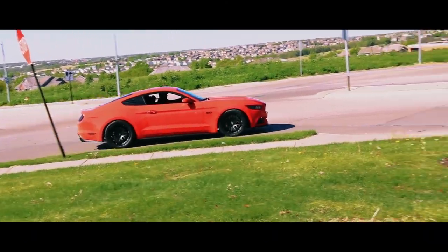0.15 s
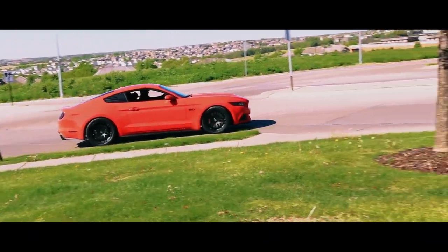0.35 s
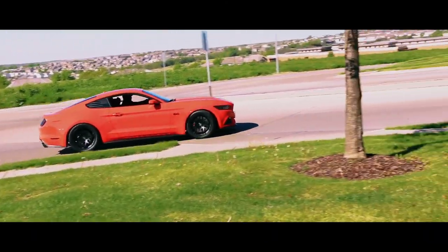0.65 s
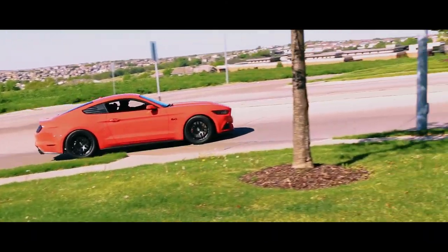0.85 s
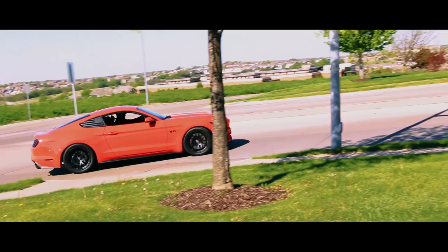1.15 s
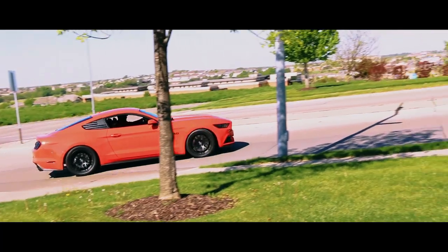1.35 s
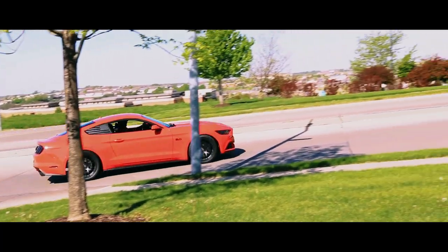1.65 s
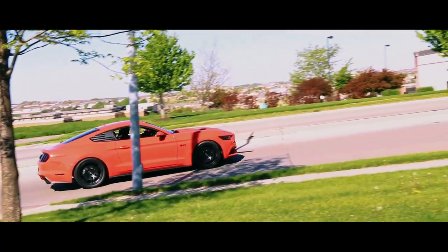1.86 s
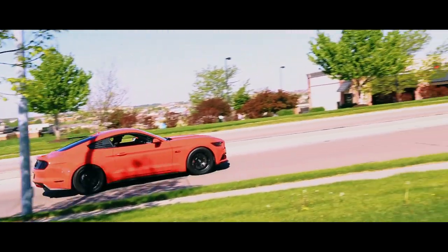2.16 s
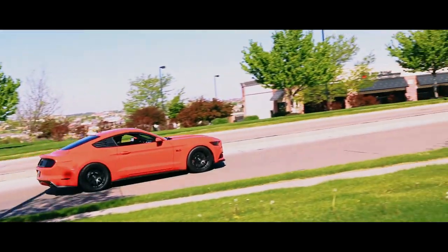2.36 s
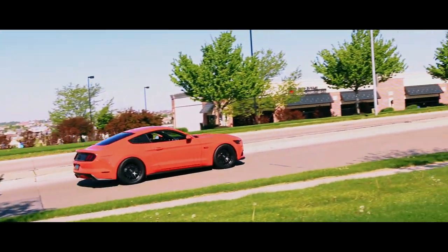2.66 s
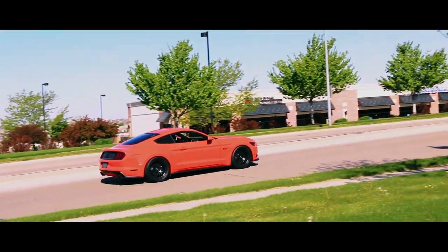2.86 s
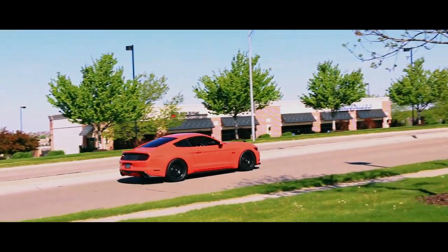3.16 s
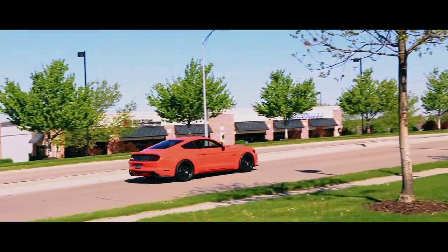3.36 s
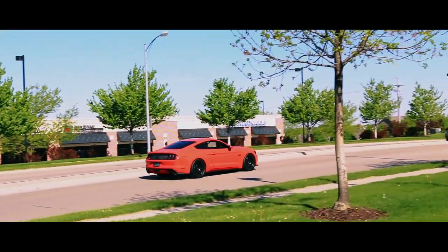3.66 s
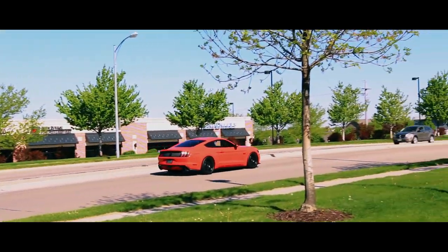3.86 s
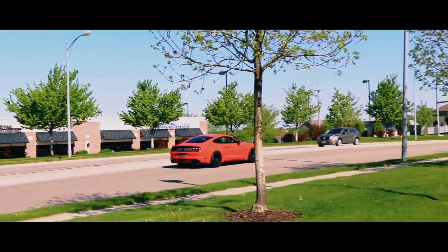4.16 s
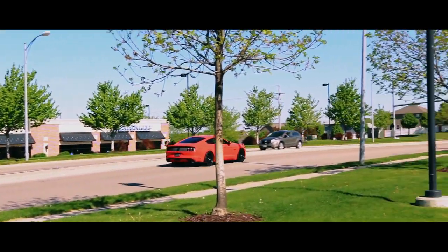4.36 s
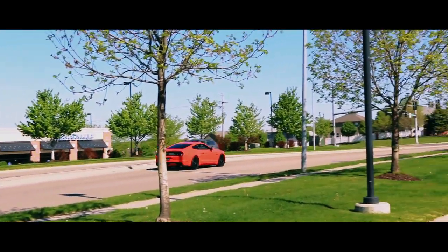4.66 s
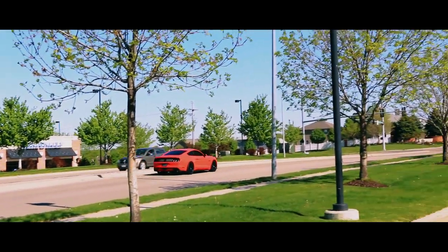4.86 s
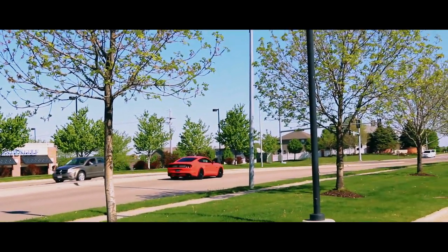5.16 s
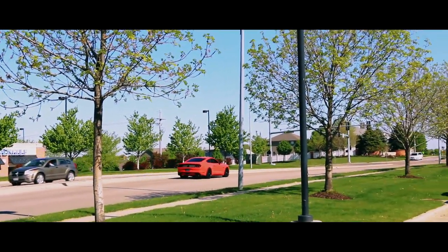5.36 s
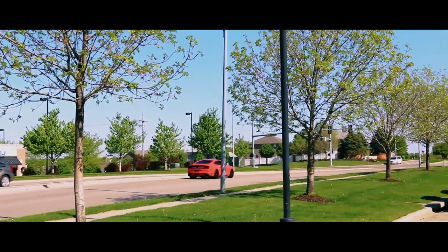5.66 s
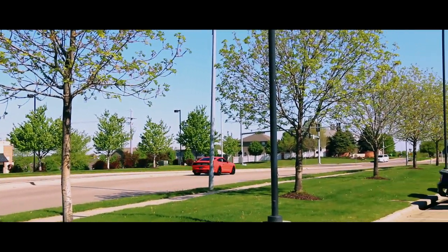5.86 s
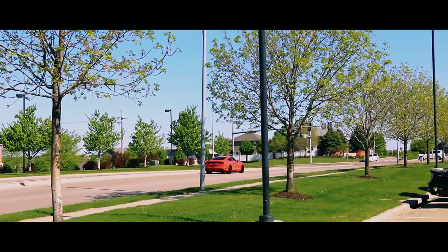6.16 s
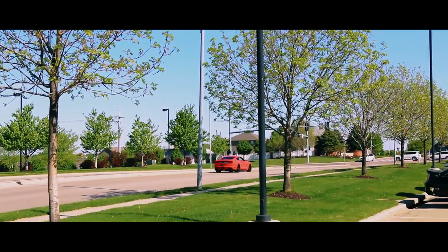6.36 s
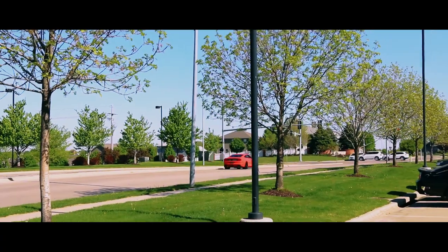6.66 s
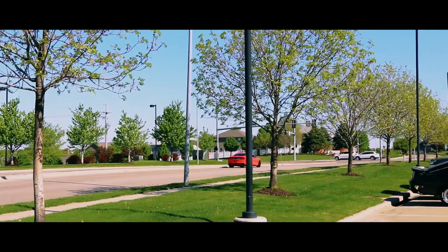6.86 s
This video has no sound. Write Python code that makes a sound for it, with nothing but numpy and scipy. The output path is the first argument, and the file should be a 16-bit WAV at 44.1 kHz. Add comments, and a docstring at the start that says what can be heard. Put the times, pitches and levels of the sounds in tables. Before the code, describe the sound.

One powerful car pulls away past an outdoor microphone: deep uneven pulses smooth into a rising, tearing exhaust note with a bright hissing edge. The throttle shuts for a gear change with muffled pops, then snaps open in a rough bark and settles into a droning second pull. Loud late cracks follow over road noise, faint low wind, short street reflections and an oncoming car's soft hum.

```python
"""The uneven burble of a V8 coupe is heard first, pulling away along a suburban road in a light wind.
It lifts off for a gear change, pulls again and lifts once more with exhaust pops, as a second car comes
the other way. Firing pulses excite pipe modes, gas noise and engine orders; road, verge and street
reflect them. Filtered noise makes the wind and the road's background, a sine the second car's hum.
The microphone input clips on the sharpest pulses."""
import sys
import numpy as np
from scipy import signal
from scipy.io import wavfile
from scipy.ndimage import uniform_filter1d

SR = 44100
rng = np.random.default_rng(int(sys.argv[2]) if len(sys.argv) > 2 else 0)


def to_wav(sig):
    """Store sig (one row per channel, or 1-D mono) as 16-bit WAV at the path in sys.argv[1].

    Samples outside -1..1 are clipped; the rate is SR.
    """
    pcm = np.clip(np.atleast_2d(sig), -1, 1) * 32767
    pcm = np.round(pcm).astype(np.int16)
    wavfile.write(sys.argv[1], SR, pcm.T)  # frames by channels


N = 308700  # samples: 7 s


def amp(db):
    """Level to amplitude ratio: 20 dB is a factor of ten."""
    return 10 ** (np.asarray(db) / 20)


def seconds():
    """Uniform sampling: the time of each sample."""
    return np.arange(N) / SR


def evened(x):
    """Normalization: scales to rms 1."""
    return x / np.sqrt(np.mean(x ** 2) + 1e-20)


def steady(x):
    """Automatic levelling: holds the running rms near 1, so that a level curve sets the loudness."""
    power = uniform_filter1d(uniform_filter1d(x ** 2, size=6000), size=6000)
    return x / np.sqrt(abs(power) + 1e-20)


def curves(table):
    """Linear interpolation: every column after the time, one value a sample."""
    time_s, *columns = np.transpose(table)
    return [np.interp(seconds(), time_s, column) for column in columns]


def smooth_noise(size):
    """Moving average of white noise: slow random swells of rms 1."""
    return evened(uniform_filter1d(rng.standard_normal(N), size=size))


def coloured(x, points):
    """Minimum-phase filtering: a causal response whose gain follows (frequency_hz, gain_db) points."""
    frequency_hz, gain_db = np.transpose(points)
    grid_hz = np.fft.rfftfreq(4096, 1 / SR) + 1
    grid_db = np.interp(np.log(grid_hz), np.log(frequency_hz), np.maximum(gain_db, -90))
    half = grid_db * np.log(10) / 20  # log magnitude
    full = np.concatenate([half, half[-2:0:-1]])
    # the phase is the Hilbert transform of the log magnitude
    taps = np.fft.ifft(np.exp(np.conj(signal.hilbert(full)))).real[:2048]
    return signal.oaconvolve(x, taps)[:N]


def high_pass(x, order, hz):
    """Butterworth filtering: attenuates what lies below the cutoff."""
    return signal.sosfilt(signal.butter(order, hz, "high", fs=SR, output="sos"), x)


def clicks(at, size):
    """Fractional delay: each impulse is shared by two samples, so that even spacing stays even."""
    whole = at.astype(int)
    part = at - whole
    return np.bincount(whole, size * (1 - part), N + 1)[:N] + np.bincount(whole + 1, size * part, N + 1)[:N]


# Wind level: time_s [s], level_db [dB rms, before the puffs]
WIND_LEVEL = [(0.0, -30), (0.13, -26), (0.58, -34), (2.55, -43), (2.96, -50.5), (3.9, -39), (4.17, -62),
              (6.57, -23), (7.0, -26)]
# Spectrum of turbulence at the microphone: frequency_hz [Hz], gain_db [dB, relative]
GUST_COLOUR = [(10, -29.5), (30, -10), (65, -1), (130, -4), (180, -3), (1000, -79.5)]
# Puffs of wind: start_s [s], strength_db [dB, relative]
BUFFETS = [(0.13, -15), (0.21, -18), (0.62, -24.5), (0.961, -33), (1.44, -24)]
BUFFET_MS = 8.7  # time constant of each puff's rise and fall


def wind():
    """Turbulent pressure on the microphone: lumpy low noise with a few stronger puffs."""
    lumps = smooth_noise(2500)
    swell = 0
    for start_s, strength_db in BUFFETS:
        from_peak_ms = abs(seconds() - start_s - .02) * 1000
        swell = swell + amp(strength_db) * np.exp(-from_peak_ms / BUFFET_MS)
    turbulence = amp(4.0 * lumps) * coloured(rng.standard_normal(N), GUST_COLOUR)
    return (amp(curves(WIND_LEVEL)[0]) + .5 * swell) * steady(turbulence)


# Broadband road and background noise: time_s [s], level_db [dB, about which it fluctuates]
BACKGROUND_LEVEL = [(0, -30), (2.9, -26.5), (3.1, -34), (4.2, -30), (5.4, -29.5), (6.2, -20), (7, -21)]
# Spectrum of that noise: frequency_hz [Hz], gain_db [dB, relative]
BACKGROUND_COLOUR = [(60, -22.5), (110, -29), (180, -4.5), (320, -7), (700, 3.5), (1200, -3.5),
                     (2500, -11.5), (4500, -24.5), (8000, -38.5), (16000, -75)]


def background():
    """Broadband random noise: road and background throughout, swelling as the second car approaches."""
    lumps = smooth_noise(900)
    noise = evened(coloured(rng.standard_normal(N), BACKGROUND_COLOUR))
    return amp(curves(BACKGROUND_LEVEL)[0] + 1.8 * lumps) * noise


# Engine of the oncoming car: time_s [s], pitch_hz [Hz], level_db [dB rms]
ONCOMING_HUM = [(4.15, 79.3, -49), (5.67, 70.1, -35.5), (7.0, 69.8, -23.5)]


def oncoming():
    """Periodic source: a sinusoidal engine hum, sinking in pitch as the car slows."""
    pitch_hz, hum_db = curves(ONCOMING_HUM)
    fade = np.clip((seconds() - 4.15) / 0.17, .0, 1)
    return np.sqrt(2) * amp(hum_db) * fade * np.sin(2 * np.pi * np.cumsum(pitch_hz) / SR)


STREET_T60_S, STREET_DB = .3, -15  # kerbs, trees and shop fronts: 60 dB decay time, level of the tail


def street(x):
    """Reverberation: sparse decaying echoes of random sign, duller than the direct sound."""
    at = np.arange(300, 20000, 22)
    taps = np.zeros(20100)
    sign = rng.choice([-1., 1.], len(at))
    taps[at + rng.integers(0, 22, len(at))] = sign * amp(-60 * at / SR / STREET_T60_S)
    taps = signal.lfilter([1], [1, -.6], taps)
    return signal.oaconvolve(x, taps / np.linalg.norm(taps))[:N]


NEAR_M, TURN_S, RECEDE_M_PER_S = 20, 2.7, 7.0  # abreast until TURN_S, then drawing away


def distance():
    """Uniform motion: metres from tailpipe to microphone."""
    return NEAR_M + RECEDE_M_PER_S * np.maximum(seconds() - TURN_S, 0)


def echo(x, lag_ms, strength):
    """Reflection as a delayed copy: x arrives later and weaker, at a strength of 0.95 at most."""
    source_sample = np.arange(N) - lag_ms * SR / 1000
    return np.clip(strength, .0, .95) * np.interp(source_sample, np.arange(N), x)


# Bounce off the road: time_s [s], strength [0-1, capped by echo]
ROAD_BOUNCE = [(0, 0.98), (2.7, 0.72), (3.3, 0.77), (5.8, 0.48), (7, 0.16)]
BOUNCE_MS_M = 70.85  # lag times distance [ms m]: the lag shrinks with distance


def road(x):
    """Interference with the ground reflection; rough asphalt scatters its treble."""
    bounce = echo(x, BOUNCE_MS_M / distance(), curves(ROAD_BOUNCE)[0])
    return x + signal.lfilter([.4], [1, -.6], bounce)


# Shorter bounce off the verge: time_s [s], lag_ms [ms], strength [0-1]
VERGE_BOUNCE = [(0, 0.58, 0.25), (3.9, 0.24, 0), (4.3, 0.38, 0.24), (4.75, 0.3, 0.32), (5.0, 0.34, 0.45),
                (5.35, 0.37, 0.67), (7, 0.24, 0.4)]


def verge(x):
    """Comb filtering: a shorter bounce off the verge hollows the treble."""
    return x + echo(x, *curves(VERGE_BOUNCE))


def puffs(train, ms):
    """Turbulent jet noise: each click releases a burst of noise that decays exponentially."""
    envelope = signal.lfilter([1], [1, -np.exp(-1000 / (ms * SR))], train)
    return envelope * rng.standard_normal(N)


def ring(x, hz, width):
    """Damped resonance: one mode of given frequency and bandwidth (Hz), struck by x."""
    t = np.arange(3000) / SR
    return signal.oaconvolve(x, width * np.exp(-np.pi * width * t) * np.cos(2 * np.pi * hz * t))[:N]


BOOM_HZ, BOOM_WIDTH_HZ = 308.3, 92  # lowest pipe mode: frequency, width of its narrower resonance


def thud(train, width):
    """Cascaded resonance: the lowest pipe mode, with steep flanks and little beneath it."""
    above = high_pass(train, 4, 240)
    return -ring(ring(above, BOOM_HZ, width), BOOM_HZ, 3.87 * width)


# Overtones of the exhaust pipe: frequency_hz [Hz], gain_db [dB, relative]
PIPE_COLOUR = [(250, -18), (420, -4.5), (560, 0.0), (1100, 4), (1300, -2), (1550, -14.5), (2200, -43),
               (5000, -96)]


def pipe(train):
    """Pipe resonance: overtones of the pulses, which reach the microphone as pressure dips."""
    return -coloured(train, PIPE_COLOUR)


# Harder firings, and unburnt fuel going off in the pipe:
# start_s [s], blow_db [dB, relative], treble_db [dB, drive of the crack against that of the thump]
POPS = [(0.051, -1.5, -23), (0.147, -6, -25), (0.262, -3, -13.5), (0.315, -2, -14), (0.547, -10.5, -18),
        (0.611, -11, -16), (0.869, -6, -11.5), (0.966, -7.5, -13), (1.015, -17, -11), (1.123, -14, -8),
        (1.45, -8.5, -10), (1.488, -6, -20), (1.61, -7, -9), (3.224, -16, -29), (3.242, -7.5, -32),
        (3.276, -5.5, -12), (3.419, -3.5, -18), (3.574, -10, -27), (3.607, -7.5, -11), (3.651, -13, -8),
        (3.673, -14, -21), (3.694, -7, -33), (3.784, -12, -29), (5.352, -9.5, 5), (5.404, -6.5, -14),
        (5.933, 0.5, -3), (6.052, 0, -1), (6.092, -2, -3), (6.1055, 5.5, 2.5), (6.165, 1.5, 2.5),
        (6.197, 1, 0), (6.2053, 4.5, 4), (6.7745, 8, -1.5), (6.948, 2, -6), (6.964, 3, -26)]
# Spectrum of a pop's crack: frequency_hz [Hz], gain_db [dB, relative]
CRACK_COLOUR = [(500, -15.5), (1200, -5), (2500, 5), (4000, 0), (6000, -18.5), (10000, -36), (16000, -48)]
CRACK_MS = 2.5  # decay time constant of the crack's noise


def pops():
    """Impulsive excitation: each blow thumps the pipe modes, with a short crack on top."""
    start_s, blow_db, treble_db = np.transpose(POPS)
    blows = clicks(start_s * SR, amp(blow_db))
    cracks = clicks(start_s * SR, amp(blow_db + treble_db))
    one = clicks(np.array([.0]), np.array([1.]))  # reference impulse for the peak levels
    thump = 0.5 * thud(blows, 63) / thud(one, 150).max() + .5 * pipe(blows) / pipe(one).max()
    crack = coloured(0.28 * puffs(cracks, CRACK_MS) - cracks, CRACK_COLOUR)
    crack = crack / coloured(one, CRACK_COLOUR).max()
    return road(thump + 0.32 * crack)


# Combustion, steady under load and ragged with the throttle shut: time_s [s], unevenness [0-1]
UNEVEN = [(0, .3), (.3, .15), (3.0, .11), (3.08, .5), (3.8, .5), (3.95, .15), (4.2, .1), (5.3, .15),
          (5.5, .3), (5.8, .3), (5.95, .55), (7, .6)]
# Pulse of each cylinder in firing order; unequal manifolds favour some: level_db [dB, relative]
CYLINDER_DB = [3.5, 1.5, 0.5, -6.5, 2.5, 5.5, 2, 1]
# How far each cylinder's pulse steepens into a crack, in firing order: level_db [dB, relative]
SHOCK_DB = [-10, -16, -8, -11, -18, -18, 0, -4]
# Bank of each cylinder in firing order, from the cross-plane crank's uneven turn-taking: far [0 or 1]
FAR_BANK = [0, 0, 1, 0, 1, 1, 0, 1]
# Far bank's tailpipe against the near one, furthest apart with the car side-on:
# time_s [s], lag_ms [ms], level_db [dB]
BANK = [(0, 0.21, 2), (1.5, 0.41, 4.5), (2.3, 0.46, 2), (3.0, 0.5, 2.5), (4.0, .25, 2.5)]


def firings(cycles, spread_db=5.5, jitter=.55):
    """Cyclic variation: one pulse and one crack a firing, sized by manifold and luck of combustion."""
    count = np.arange(3, int(8 * cycles[-1]) - 1)  # eight firings a four-stroke cycle
    cylinder = count % 8
    when = np.interp(count, 8 * cycles, np.arange(N)).astype(int)
    uneven, bank_ms, bank_db = (c[when] for c in curves(UNEVEN) + curves(BANK))
    luck = np.clip(rng.standard_normal((len(count), 3)), -1.8, 1.8)
    far = np.array(FAR_BANK)[cylinder]
    luck_db = spread_db * uneven * luck[:, 0]
    place = count + .3 + jitter * uneven ** 2 * luck[:, 1]
    at = np.interp(place, 8 * cycles, np.arange(N)) + far * bank_ms * SR / 1000
    pulses = clicks(at, amp(np.array(CYLINDER_DB)[cylinder] + far * bank_db + luck_db))
    cracks = clicks(at, amp(np.array(SHOCK_DB)[cylinder] + .6 * luck_db + 1.5 * luck[:, 2]))
    return pulses, cracks


# Pure tones: order [multiples of the cycle rate]
ORDERS_HEARD = (14, 15, 16, 20, 22, 24, 32)
# Strength of each order: level_db [dB, relative]
ORDER_DB = [-10.5, -14, 0, -8, -8, 2, -7.5]
BEHIND_S = 4  # from behind the car the tones balance otherwise
# Change of each order after BEHIND_S: change_db [dB]
BEHIND_DB = [1, 6, -1, -7, 6, -3.5, 3]
# What the silencer lets through of a tone: frequency_hz [Hz], gain_db [dB, relative]
SILENCER = [(190, -42), (225, -13.5), (260, -11.5), (290, -11.5), (330, -20.5), (365, -21.5), (395, -33),
            (450, -44.5), (530, -23.5), (590, -33), (660, -33.5), (1100, -52)]
# How hard the engine drives its orders: time_s [s], drive_db [dB, relative]
LOAD = [(0, -3.5), (2.0, -2), (3.0, -11), (3.15, -42), (3.72, -30), (3.85, -16), (3.915, 7), (3.965, 2),
        (4.03, 1.5), (4.12, -8), (4.4, 5), (4.6, -0.5), (4.9, -4), (5.35, -8), (5.751, -20), (5.9, -40),
        (7, -37)]
# Tone of the firing rate, heard as the tailpipes swing round in the first pull:
# time_s [s], level_db [dB rms, before the road bounce]
FIRING_TONE = [(0, -43.5), (1.2, -40), (2.0, -35), (2.3, -20.5), (2.9, -28), (3.03, -26.5), (3.15, -67.5)]
TONE_BOUNCE = 0.86  # strength 0-1: long waves come off the road almost whole
WAVER_DB = 5  # rms waver of the tones, scaled by the unevenness


def tones(hz, cycles):
    """Order analysis: harmonics swell through the silencer's pass band and the road's interference."""
    filter_hz, filter_db = np.transpose(SILENCER)
    waver = rng.standard_normal((2, len(ORDERS_HEARD), N))
    waver = uniform_filter1d(uniform_filter1d(waver, size=900), size=600)
    waver = curves(UNEVEN)[0] * evened(waver)
    behind = np.arange(N) > BEHIND_S * SR
    orders = 0
    for k, own_db, turn_db, level_waver, phase_waver in zip(ORDERS_HEARD, ORDER_DB, BEHIND_DB, *waver):
        passed_db = np.interp(np.log(k * hz), np.log(filter_hz), filter_db)
        level_db = own_db + passed_db + WAVER_DB * level_waver + behind * turn_db
        orders = orders + amp(level_db) * np.cos(2 * np.pi * k * cycles + .8 * phase_waver)
    firing = amp(curves(FIRING_TONE)[0]) * np.cos(16 * np.pi * cycles)
    direct = orders * amp(curves(LOAD)[0]) + firing
    return np.sqrt(2) * (direct + echo(direct, BOUNCE_MS_M / distance(), TONE_BOUNCE))


# Bark as the throttle snaps open: time_s [s], depth_db [dB, relative]
BARK = [(3.86, -73), (3.92, -29), (3.96, -18.5), (4.06, -10), (4.16, -14), (4.25, -16), (4.32, -34),
        (4.8, -64)]
# Runs of dips that bite deeper: start_s [s], extra_db [dB, before smoothing], length_s [s]
CRACKLES = [(3.957, 8, .004), (3.982, 11.5, 0.0071), (4.005, 5.5, 0.0062), (4.016, 14, .005),
            (4.044, 7, 0.011), (4.063, 9, 0.0076), (4.104, 14, 0.022), (4.136, 15, 0.0051),
            (4.152, 13, 0.0084), (4.18, 13, 0.0086), (4.24, 14.5, 0.014)]


def bark(cycles):
    """Wave steepening: each pipe wave sharpens to a dip, two a firing, wavering, deeper in short runs."""
    noise = rng.standard_normal((2, N))
    clumps, waver = (evened(uniform_filter1d(uniform_filter1d(v, size=200), size=100)) for v in noise)
    t = seconds()
    runs_db = sum(db * ((t > s) & (t < s + length)) for s, db, length in CRACKLES)
    runs_db = uniform_filter1d(runs_db, size=60)
    trough = 1 + np.cos(32 * np.pi * cycles + .2 * waver)  # zero at the bottom of each wave
    narrow = amp(1.5 * clumps + runs_db) * np.exp(-50 * trough) * 1.25
    broad = .8 * np.exp(-1.5 * trough)
    return -amp(curves(BARK)[0]) * high_pass(narrow + broad, 2, 200)


# First pull, lift-off, clutch bite, second pull, coast; the driveline surges as it winds up:
# time_s [s], cycle_hz [four-stroke cycles a second, Hz]
CRANK = [(0, 13.7), (.11, 14.55), (.39, 16.6), (.5, 16.95), (1.19, 20.8), (1.46, 22.45), (1.6, 22.77),
         (1.68, 23.3), (1.79, 24.3), (1.92, 24.45), (2.21, 27.23), (2.47, 29.35), (2.63, 31.35),
         (2.77, 31.85), (2.91, 33), (2.98, 32.9), (3.13, 30), (3.6, 26.55), (3.8, 20.6), (3.87, 21),
         (4.0, 24.5), (4.04, 24.4), (4.16, 22.55), (4.31, 23.85), (4.44, 23.95), (4.62, 25.15),
         (4.74, 25.1), (4.91, 25.38), (5.05, 26.03), (5.3, 26.17), (5.42, 25.9), (5.7, 25.6), (7, 24)]
# Exhaust: time_s [s], rasp_db [gas rasp, dB rms], boom_db [lowest pipe mode, dB, relative],
# sizzle_db [shock-front sizzle, dB rms]
EXHAUST = [(0.0, -73, -9.5, -56.5), (0.3, -45.5, -9.5, -65.5), (0.94, -37.5, -10.5, -58.5),
           (1.97, -26, -13.5, -43.5), (2.55, -18.5, -19, -27.5), (2.88, -23, -34, -32.5),
           (2.99, -26.5, -22, -54), (3.1, -50.5, -24.5, -77), (3.88, -54.5, -12, -74),
           (3.93, -27, -13.5, -65), (3.96, -21, -3.5, -42.5), (4.15, -27.5, -55, -43),
           (4.33, -26.5, -15.5, -44), (4.6, -19, -18.5, -39.5), (4.97, -28, -22.5, -57.5),
           (5.24, -22, -19, -49), (5.54, -40.5, -19.5, -90), (5.85, -33.5, -17, -51),
           (6.15, -27, -19.5, -43), (6.67, -23.5, -15.5, -48), (7.0, -30.5, -16.5, -74)]
# Spectrum of the gas rasp: frequency_hz [Hz], gain_db [dB, relative]
RASP_COLOUR = [(900, -23), (1500, 6), (2000, 7.5), (2800, 1), (3800, -4.5), (5000, -10), (7000, -46.5),
               (16000, -66.5)]
# Spectrum of the shock-front sizzle: frequency_hz [Hz], gain_db [dB, relative]
SIZZLE_COLOUR = [(3000, -14), (4200, 9), (5500, 5.5), (8500, -7.5), (11000, -14), (16000, -23.5)]
PIPE_DB, PIPE_PER_RASP = 3, 0.46  # overtones follow the rasp gently: offset dB, dB per dB
PIPE_LOSS_DB_PER_M = 0.4565
SHARP_M = 24  # beyond this, turbulence and scattering blur the cracks into hiss
START_CYCLE = .3  # how far into its cycle the engine is at the start


def coupe():
    """Source and resonator: firing pulses excite pipe modes and release gas noise, beside pure tones."""
    rasp_db, boom_db, sizzle_db = curves(EXHAUST)
    pipe_db = PIPE_DB + PIPE_PER_RASP * rasp_db - PIPE_LOSS_DB_PER_M * distance()
    cycle_hz = curves(CRANK)[0]
    cycles = START_CYCLE + np.cumsum(cycle_hz) / SR
    train, cracks = firings(cycles)
    sharp = np.minimum(SHARP_M / distance(), 1) ** 2
    boom = thud(train, BOOM_WIDTH_HZ)
    overtones = pipe(train + .05 * curves(UNEVEN)[0] * puffs(train, 2.5))
    gas = .075 * puffs(.2 * train + cracks, 5.0)
    rasp = coloured(sharp * (-.3 * train - cracks) + gas, RASP_COLOUR)
    hiss = .065 * puffs(cracks, 4.5) + .03 * (1 - sharp) * puffs(cracks, 20.)
    sizzle = coloured(-sharp * cracks + hiss, SIZZLE_COLOUR)
    low = amp(boom_db - 3.5) * steady(road(boom)) + amp(pipe_db) * steady(road(overtones))
    high = amp(rasp_db) * steady(verge(road(rasp))) + amp(sizzle_db) * steady(verge(sizzle))
    return tones(cycle_hz, cycles) + low + high + bark(cycles)


FADE_IN_S = .004


def scene():
    """Superposition: both cars, background and wind; the street answers the coupe alone."""
    car = coupe() + pops()
    fade = np.minimum(seconds() / FADE_IN_S, 1)
    return (fade * (car + amp(STREET_DB) * street(car) + oncoming() + background() + wind()))[None]


EDGE_HZ = 15700  # upper band limit


def record(dry):
    """Saturation: the input clips just under full scale, then a low-pass filter limits the band."""
    clipped = np.clip(dry, -.98, .98)
    low_pass = signal.firwin(1535, EDGE_HZ, window=("kaiser", 9), fs=SR)
    return signal.oaconvolve(clipped, low_pass[None], "same")


dry = scene()
out = record(dry)
to_wav(out)
```